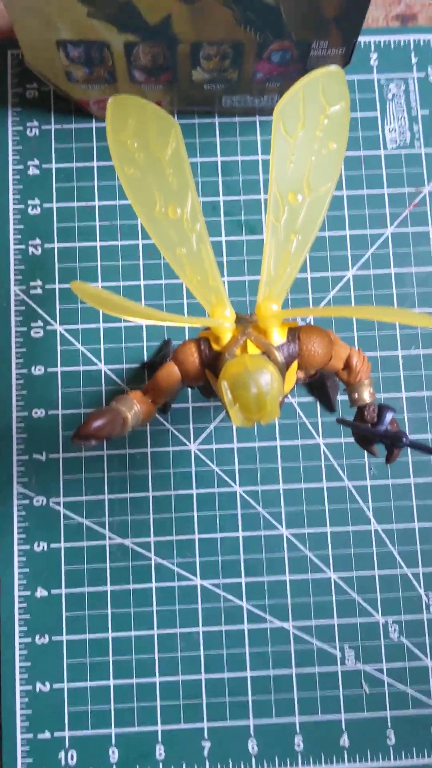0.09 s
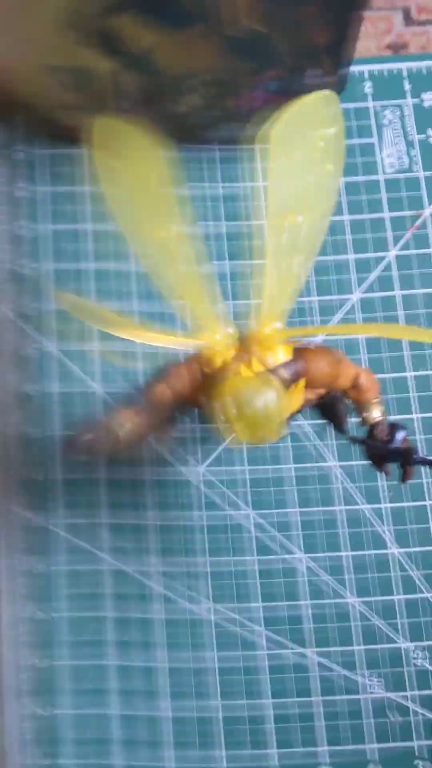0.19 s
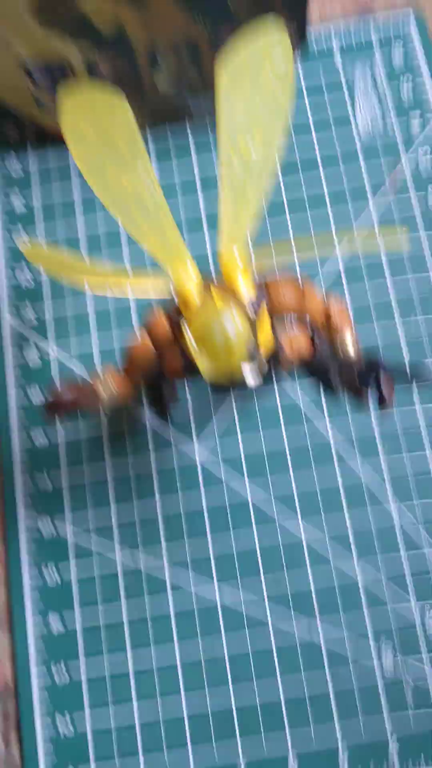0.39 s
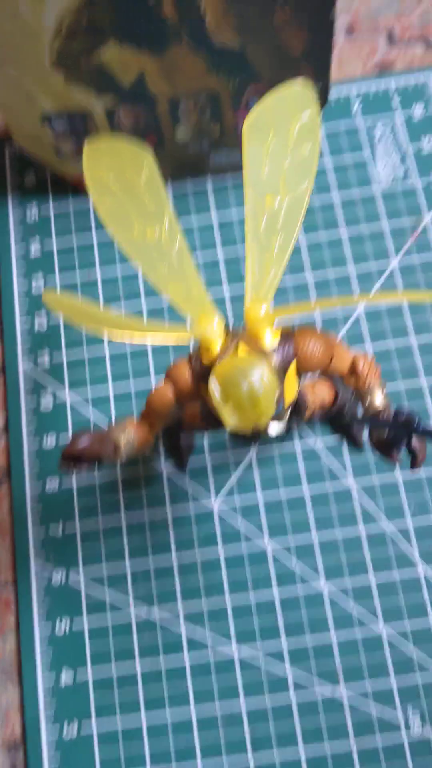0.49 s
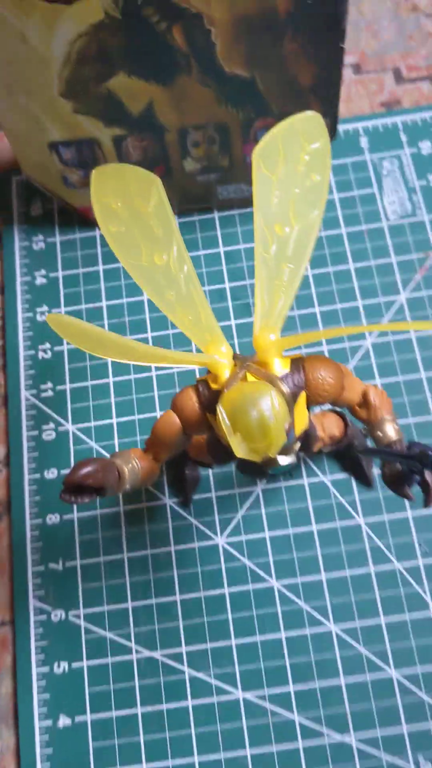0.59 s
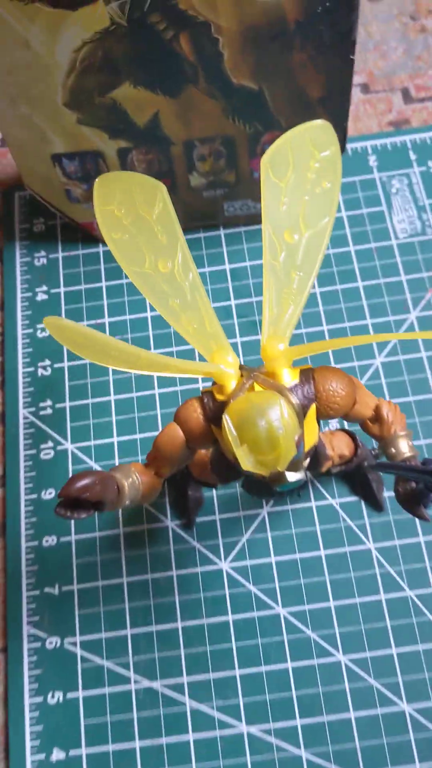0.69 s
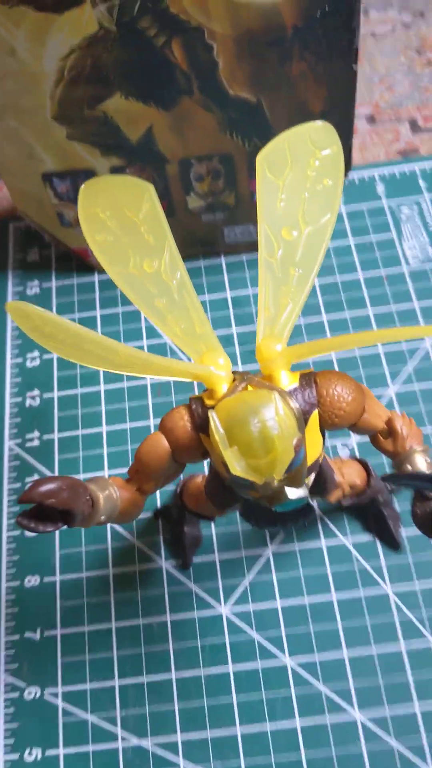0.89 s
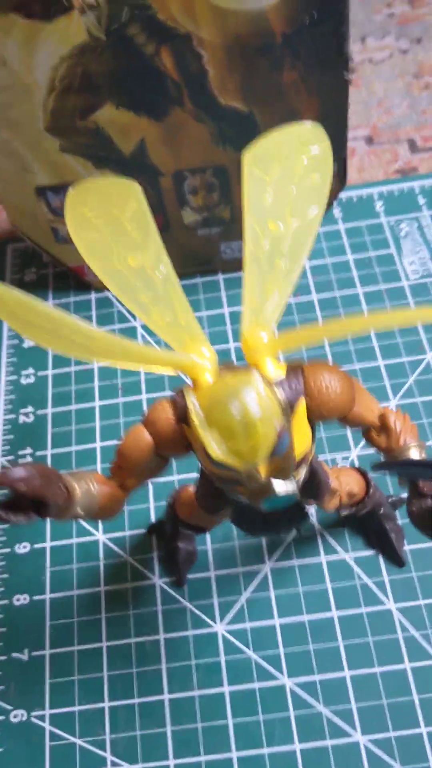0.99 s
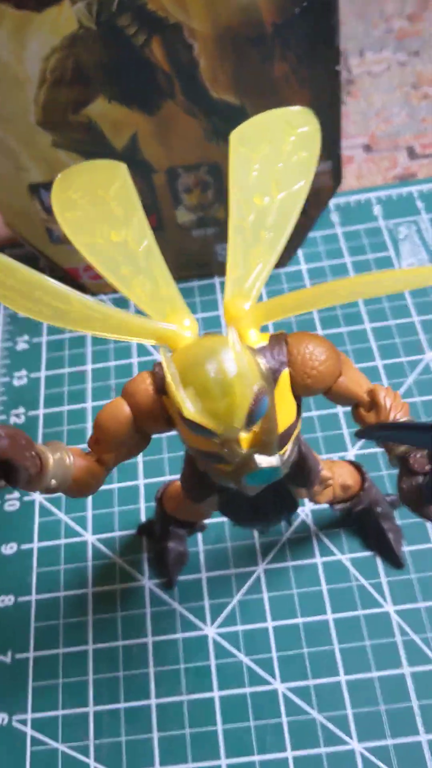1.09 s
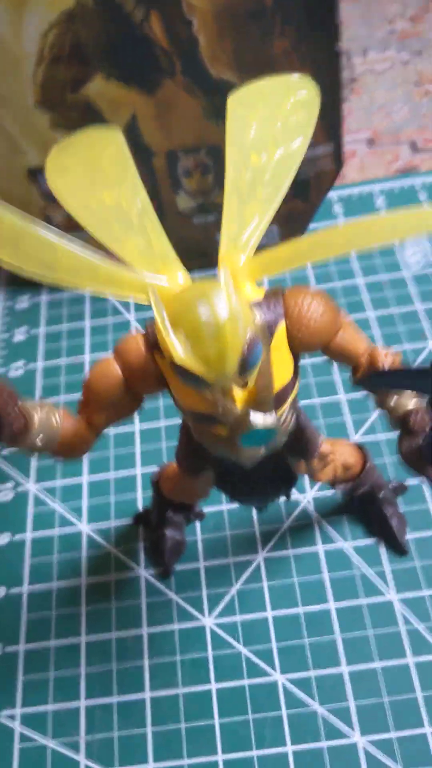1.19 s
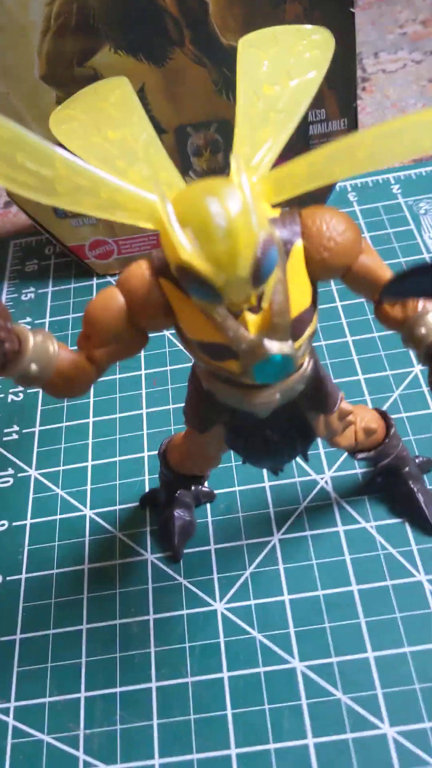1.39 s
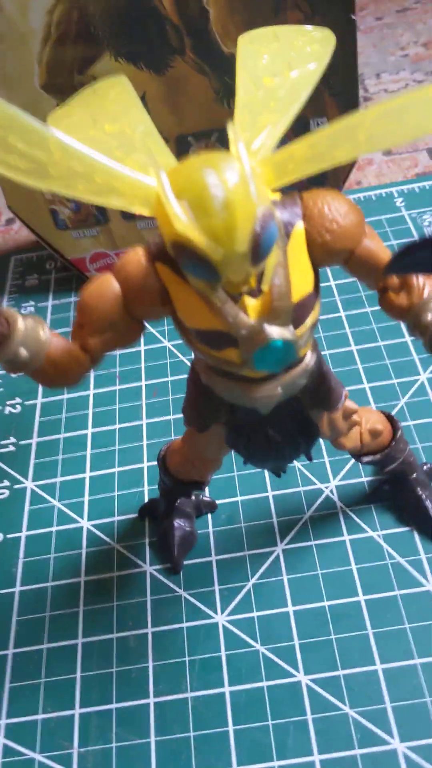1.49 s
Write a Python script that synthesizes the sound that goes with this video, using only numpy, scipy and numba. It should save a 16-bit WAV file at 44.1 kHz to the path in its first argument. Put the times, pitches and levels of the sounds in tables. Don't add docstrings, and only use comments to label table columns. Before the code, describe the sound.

A finger covering a phone microphone pops, ticks and scrapes faster, ending in a sharp plastic clack with a low thump and short tail; then sparse tiny ticks over low room hum and hiss.

```python
import sys
import numpy as np
from scipy import signal
from scipy.io import wavfile
from scipy.ndimage import uniform_filter1d
from numba import njit

SR = 44100
rng = np.random.default_rng(int(sys.argv[2]) if len(sys.argv) > 2 else 0)


def wav_record(signal):
    frames = np.transpose(np.atleast_2d(signal))
    bounded = np.clip(frames, -1, 1)
    quanta = np.round(bounded * 32767).astype(np.int16)
    wavfile.write(sys.argv[1], SR, quanta)


def boost_factor(decibels):
    exponent = np.asarray(decibels, float) / 20
    return 10 ** exponent


N = 66150
T = np.arange(N) / SR

# (time [s], level [dB], cavity [Hz], share of bright hiss [dB])
SCRAPE = [
    (0, -49.5, 1390, -1),
    (.06, -45, 1350, 0.5),
    (.13, -48.5, 1471, 6.5),
    (0.214, -39.5, 1220, 8),
    (0.243, -28, 980, 6.5),
    (0.269, -16.5, 1500, -3),
    (0.287, -19, 2000, 2),
    (0.298, -25, 3300, 9),
    (0.31, -36.5, 3500, 2.5),
]
# (centre [Hz], width [Hz], level [dB])
SKIN_MODES = [(276, 590, -6.5), (750, 310, -5.5), (1124, 1200, -5), (3100, 1600, 0.5), (4800, 1200, -1),
              (8500, 3300, -10.5), (12490, 2100, -14.5)]
# (time [s], peak [dB], ring [Hz])
CATCHES = [(0.2228, -27, 513), (0.2254, -25, 555), (0.2256, -27, 1580), (0.2276, -28, 4660),
           (0.2313, -25, 689), (0.2341, -23.5, 473), (0.235, -22, 2950), (0.2368, -33, 3820),
           (0.2375, -16.5, 920), (0.2403, -24.5, 3400), (0.2409, -20, 1660), (0.2415, -21.5, 540),
           (0.2453, -11, 886), (0.2462, -15.5, 5030), (0.2491, -19.5, 4980), (0.2499, -9.5, 990),
           (0.2541, -15.5, 580), (0.254, -14, 1549), (0.2589, -8, 1350), (0.2594, -13.5, 2662),
           (0.2635, -2, 1762), (0.2665, -2.5, 1378), (0.2719, -7.5, 1463), (0.2716, -6, 2293),
           (0.2748, -3.5, 1335), (0.277, -10, 1424), (0.28, -13, 602), (0.2808, -4.5, 2023),
           (0.286, -13.5, 3160), (0.2851, -10.5, 4224), (0.2849, -7.5, 602), (0.2853, -12, 1888),
           (0.2874, -11.5, 2877), (0.2906, -8.5, 1050), (0.2923, -7.5, 3236), (0.2934, -12.5, 4651),
           (0.2936, -11.5, 4025), (0.2954, -8, 2193), (0.2972, -13, 1119), (0.2976, -15, 3359)]
# (time [s], peak [dB], tick over pop [dB])
POPS = [
    (0.0303, -12.5, -6),
    (0.0497, -18.5, -3.5),
    (.0800, -16, -11),
    (0.1624, -21.5, -26),
    (.1927, -21.5, -7.5),
]
# (time [s], peak [dB], ring [Hz], t60 [s], left over right [dB])
TICKS = [(.0015, -14, 4660, 0.0024, 28), (0.0304, -41, 12600, 0.0017, -5),
         (0.0307, -21.5, 4500, 0.0086, 26), (0.0306, -16.5, 3100, 0.012, 24), (.0512, -30, 5500, .007, 26),
         (.0812, -27, 5670, .007, 26), (.0815, -31, 3940, .008, 26), (.0507, -35, 9000, 0.0055, 14),
         (0.0696, -17.5, 8150, 0.0065, 28), (0.0696, -23, 2400, 0.013, 22),
         (.0700, -16.5, 4800, 0.0078, 21), (0.071, -24.5, 14000, 0.0045, 20),
         (0.08, -24.5, 8600, 0.008, 32), (0.1062, -10, 3650, 0.003, 29), (.1062, -5, 4380, 0.003, 32),
         (0.1059, -13.5, 5200, 0.0025, 35), (0.1064, -18, 2550, .003, 27),
         (0.1068, -14.5, 8500, 0.0045, 37), (0.1066, -23, 12900, 0.0021, 8),
         (.1690, -20.5, 3930, 0.016, 36), (0.17, -23, 3050, .01, 28), (.1702, -28, 2200, 0.011, 30),
         (0.1904, -21.5, 3940, 0.018, 28), (0.2028, -14, 4800, .008, 38), (0.203, -20.5, 1600, 0.013, 20),
         (0.2039, -26, 8300, 0.0067, 46)]
# (time [s], peak [dB], ring [Hz], t60 [s], left over right [dB])
CLACKS = [
    (0.3025, -13.5, 11500, .012, 1.5),
    (.3011, -4.5, 3850, 0.013, 7),
    (.3021, -8, 4870, 0.012, 8),
    (.3013, -10, 1100, 0.018, 14),
    (.3019, -12.5, 5500, .009, -3),
    (.3020, -13.5, 3140, .012, -3.5),
    (.3033, -9.5, 2020, .01, 8),
    (.3049, -7, 3800, 0.014, 6),
    (0.305, -17, 11000, .008, 2.5),
]
# (time [s], peak [dB], ring [Hz], t60 [s])
FAINT_TICKS = [(.4585, -39, 3940, .012), (.4985, -46, 4500, .008), (.5300, -47, 4800, .006),
               (.5470, -47, 4600, .006), (.5555, -45, 4610, .008), (.5692, -45, 4700, .008),
               (.5694, -51, 5200, .007), (.5698, -52, 1940, .01), (.5715, -54, 3530, .008),
               (.4590, -47, 2500, .008), (.4590, -48, 5500, .006), (.6400, -56, 6300, .005),
               (.6570, -58, 9400, .006), (1.1026, -48, 3790, .008), (1.1022, -46, 1510, .01),
               (1.2480, -44, 1980, .012), (1.2480, -50, 4800, .005), (1.3222, -46, 2070, .01),
               (1.3230, -55, 14800, .004), (1.3550, -54, 13000, .004), (1.3970, -51, 14800, .003),
               (1.3972, -54, 12800, .003), (1.2482, -57, 15000, .004), (1.4376, -47, 2070, .012)]
# (frequency [Hz], density [dB per Hz])
CRACK_SPECTRUM = [(180, -39), (300, -5.5), (1190, -13), (3950, -4), (6000, -11), (6960, -20.5), (8940, -22),
                  (11500, -2), (16000, -21)]
# (centre [Hz], level [dB], t60 [s])
TAIL_BANDS = [(517, -11.5, 0.1), (990, -8, .12), (2003, -15.5, 0.38), (3150, -8.5, 0.32), (4330, 2.5, 0.14),
              (6500, -15, 0.15), (10750, -0.5, 0.11), (14000, -1.5, .12)]
# (frequency [Hz], level [dB], start [s], swell [s], release [s], t60 [s])
HIGH_TONES = [(7741, -72, .42, .05, .78, .8), (8387, -67, .40, .03, .5, .6), (8210, -71, .40, .03, .5, .45),
              (7410, -78, .44, .04, .56, .3)]
# (time [s], size [-1..1], rise [s])
STEPS = [
    (0.3038, 0.45, 0.0039),
    (0.8833, -0.028, 0.000089),
    (.8868, -0.013, 0.00017),
]
# (time [s], size [full scale], swing [Hz])
BRUSHES = [
    (0.2816, 0.08, 260),
    (0.2867, -.12, 170),
    (0.2966, -0.048, 150),
    (0.2964, -.09, 800),
]
# (frequency [Hz], density [dB per Hz])
ROOM_SPECTRUM = [(25, 0.5), (173, -4), (329, -19), (460, -16.5), (657, -15), (2120, -24), (4800, -29),
                 (7000, -52)]
# (frequency [Hz], left over right [dB])
ROOM_PAN = [(60, 1), (110, 6.5), (200, -1.5), (380, 6), (700, 8.5), (1290, 1), (2380, 1.5), (4400, 2),
            (8120, 3), (15000, -2)]
# (frequency [Hz], likeness [0-1])
ROOM_LIKENESS = [(60, .1), (130, 0.8), (700, .45), (1400, 0), (15000, 0.01)]
# (centre [Hz], width [Hz], level [dB])
HUM = [(70, 14, -10.5), (122, 65, -8), (175, 64, -8.5), (630, 180, -11.5), (1865, 150, -10),
       (4300, 370, -17.5)]
# (centre [Hz], width [Hz], level [dB])
HISS = [(7506, 3090, -12.5), (10220, 4500, 2.5), (14500, 6300, -4.5)]


def at(table, hz, col=1):
    table = np.array(table, float)
    return np.interp(np.log(hz), np.log(table[:, 0]), table[:, col])


def unit(x):
    return x / np.sqrt(np.mean(x ** 2))


def noise():
    return rng.standard_normal(N)


def right_below(db):
    return boost_factor(np.array([[0], [-db]]))


@njit
def svf(x, hz, width):
    y, b, l = np.empty(len(x)), 0., 0.
    for i in range(len(x)):
        g, k = np.tan(np.pi * hz[i] / SR), width[i] / hz[i]
        v = (b + g * (x[i] - l)) / (1 + g * (g + k))
        b, l, y[i] = 2 * v - b, l + 2 * g * v, k * v
    return y


def band(x, hz, width):
    hz = min(hz, .45 * SR)
    return signal.lfilter(*signal.iirpeak(hz, hz / width, fs=SR), x)


def fade(start, t60, rise=.0001):
    t = np.maximum(T - start, 0)
    return np.minimum(t / rise, 1) * boost_factor(-60 * t / t60)


def walk(rate):
    k = int(SR / rate)
    held = np.repeat(rng.standard_normal(N // k + 1), k)
    return 1.2 * uniform_filter1d(uniform_filter1d(held, k), k)[:N]


def ring(start, hz, t60, rise=.0001):
    return fade(start, t60, rise) * np.sin(2 * np.pi * hz * (T - start))


def slips():
    slips_per_s, scatter_db = 9000, 3.5
    chance = rng.random((3, N))
    size_db = scatter_db * np.minimum(-np.log(chance[2] + 1e-9), 4)
    return (chance[0] < slips_per_s / SR) * np.sign(chance[1] - .5) * boost_factor(size_db)


def scrape():
    catch_db, catch_t60_s, catch_rise_s = 3.5, 0.015, .0011
    s, db, hz, hiss_db = np.array(SCRAPE, float).T
    hz = np.interp(T, s, hz) * (1 + 0.05 * walk(200.7))
    width_hz = 0.57 * 1.5 * hz
    cavity = svf(svf(slips(), hz, width_hz), hz, width_hz) * boost_factor(1.8 * walk(300))
    skin = 0
    for f, w, d in SKIN_MODES:
        mode = band(band(slips(), f, 1.2 * w), f, 1.2 * w)
        skin = skin + boost_factor(d + 1.4 * walk(202.9)) * unit(mode)
    left = unit(cavity) + boost_factor(np.interp(T, s, hiss_db)) * unit(skin)
    left = left * boost_factor(np.interp(T, s, db, right=-120))
    for t, d, f in CATCHES:
        left = left + boost_factor(d + catch_db) * ring(t, f, catch_t60_s, catch_rise_s)
    right = boost_factor(-43) * band(np.roll(left, -16), 3500, 4000)
    return np.array([left, right])


def pops():
    rise_s, tick_rise_s = 0.00064, 0.00032
    grit = noise()
    grit = unit(band(grit, 1400, 1400) + .5 * band(grit, 3500, 2700) + 0.12 * band(grit, 18000, 7800))
    out = 0
    for s, db, tick_db in POPS:
        body = 1.35 * ring(s, 672, 0.011, rise_s)
        body = body + boost_factor(5) * ring(s + 0.00055, 1360, 0.0039, rise_s)
        snap = boost_factor(-6) * grit * fade(s + 0.0012, 0.0082, tick_rise_s)
        tick = ring(s + 0.00048, 3200, 0.0054, tick_rise_s) + snap
        out = out + boost_factor(db) * (body + boost_factor(tick_db) * tick)
    return out * right_below(27)


def ticks():
    faint_pan_db = 5
    out, grit = 0, noise()
    for s, db, hz, t60, pan_db in TICKS + CLACKS + [row + (faint_pan_db,) for row in FAINT_TICKS]:
        burst = unit(band(band(grit, hz, 0.45 * hz), hz, hz)) * fade(s, t60)
        tick = 0.6 * ring(s, hz, t60, 0.00012) + 0.32 * burst
        out = out + boost_factor(db) * tick * right_below(pan_db)
    return out


def knock():
    knock_s, knock_db, pan_db, right_lag_s = .3015, -10, 2, .00037
    crack_hold_s, crack_t60_s, tail_db = .0032, .011, -12.5
    out = []
    shared = noise()
    for side in (0, 1):
        lag_s = side * right_lag_s
        s = knock_s + lag_s
        src = np.roll(shared, int(lag_s * SR)) + .5 * noise()
        crack = sum(boost_factor(at(CRACK_SPECTRUM, f)) * band(src, f, f / 3)
                    for f in 400 * 2 ** np.arange(0, 5.4, .5))
        late_fade = fade(s, crack_t60_s) * boost_factor(60 * crack_hold_s / crack_t60_s)
        hold = np.minimum(late_fade, fade(s, 0.076, 0.00017))
        tail = sum(boost_factor(d) * unit(band(noise(), f, f * 0.41)) * fade(s, t60, 0.0018)
                   for f, d, t60 in TAIL_BANDS)
        both = unit(crack) * hold + boost_factor(tail_db) * tail
        out.append(boost_factor(knock_db) * both * boost_factor(pan_db * (0.5 - side)))
    return np.array(out)


def thuds():
    bass_cut_per_s, snap_share, snap_s = 40.8, 1.6, 0.00055
    left = 0
    for s, size, rise in STEPS:
        t = np.maximum(T - s, 0)
        x = bass_cut_per_s * t
        swing = np.exp(-x) * (1 - 3 * x + 3 / 2 * x ** 2 - x ** 3 / 6)
        snap = snap_share * np.exp(-t / snap_s)
        left = left + size * np.minimum(t / rise, 1) * (swing + snap)
    brushes = sum(size * ring(s, hz, 0.017, 0.0045) for s, size, hz in BRUSHES)
    return np.array([left, boost_factor(-22.5) * left + brushes])


def rings():
    out = 0
    for hz, db, s, swell, release, t60 in HIGH_TONES:
        decay_db = -60 * np.maximum(T - release, 0) / t60
        shape = np.clip((T - s) / swell, 0, 1) * boost_factor(decay_db + 1.9 * walk(35))
        out = out + boost_factor(db) * shape * np.sin(2 * np.pi * hz * T)
    return out * right_below(11)


def room_pair(hz, width):
    opposite = np.array([[1], [-1]])
    like = np.clip(at(ROOM_LIKENESS, hz), 0, 1)
    mid, side = (band(noise(), hz, width) for _ in range(2))
    lean = boost_factor(at(ROOM_PAN, hz) / 2 * opposite)
    return lean * (np.sqrt(1 + like) * mid + np.sqrt(1 - like) * side * opposite)


def room():
    room_db, hum_db = -52, -9
    swell = walk(9)
    air = 0
    for f in 28 * 2 ** np.arange(0, 8.1, 1 / 3):
        gain = boost_factor(at(ROOM_SPECTRUM, f) + .5 * swell + 2.5 * walk(12))
        air = air + gain * band(room_pair(f, f / 3), f, f / 2)
    hum = sum(boost_factor(d + 2.0 * walk(53)) * room_pair(f, w) / np.sqrt(w) for f, w, d in HUM)
    both = air / np.std(air.mean(0)) + boost_factor(hum_db) * hum / np.std(hum.mean(0))
    return boost_factor(room_db) * both / np.std(both.mean(0))


def hiss():
    hiss_db, covered_db, climb_db_per_s = -75.5, 9, 6.5
    pair = np.array([unit(sum(boost_factor(d) * band(noise(), f, w) for f, w, d in HISS)) for _ in range(2)])
    covered = np.interp(T, (.4, .7, .8834), (.8, .5, 1), left=0, right=0)
    change_db = np.array([covered_db * covered, climb_db_per_s * (T - .85)])
    return pair * boost_factor(hiss_db + change_db + 0.59 * walk(6))


def scene():
    duck_db, duck_s, recover_s = -4.5, 0.33, 0.47
    duck = boost_factor(duck_db * np.exp(-np.maximum(T - duck_s, 0) / recover_s))
    return pops() + ticks() + scrape() + knock() + rings() + thuds() + room() * duck + hiss()


def low_pass(x):
    return signal.sosfilt(signal.butter(12, 16810, fs=SR, output="sos"), x)


def record(dry):
    top_hz = 16000
    rounded = np.tanh(1.234 * dry) / 1.151
    cut = signal.ellip(8, .3, 40, top_hz, fs=SR, output="sos")
    mix = signal.sosfilt(cut, rounded)
    return low_pass(mix)


dry = scene()
out = record(dry)
wav_record(out)
```